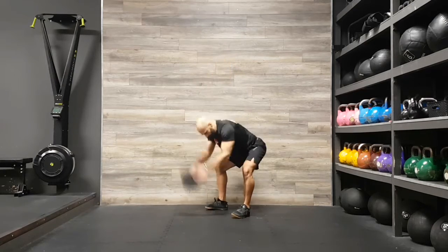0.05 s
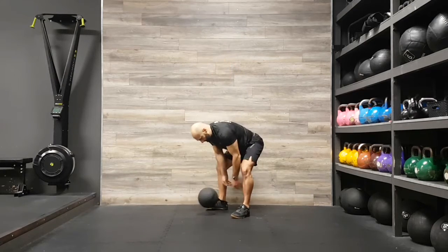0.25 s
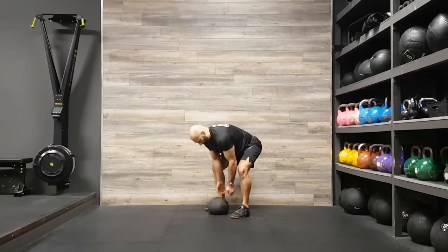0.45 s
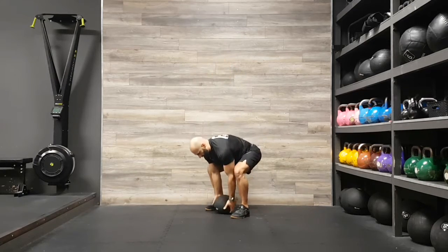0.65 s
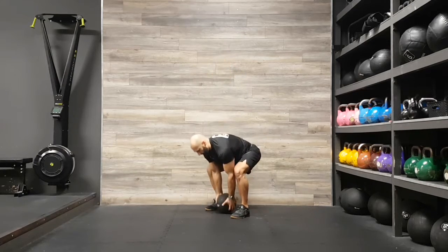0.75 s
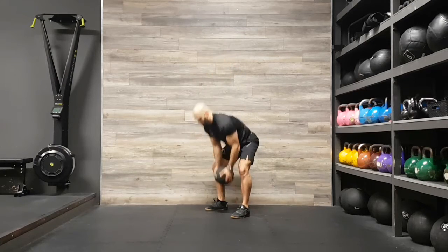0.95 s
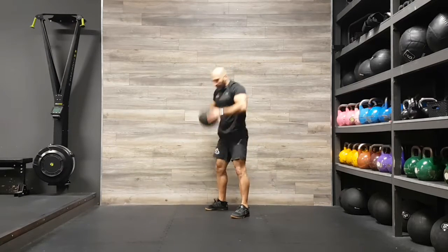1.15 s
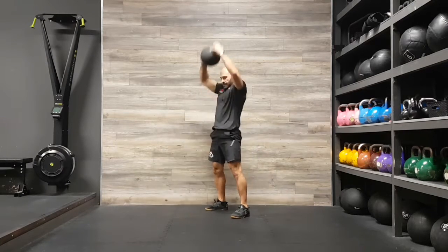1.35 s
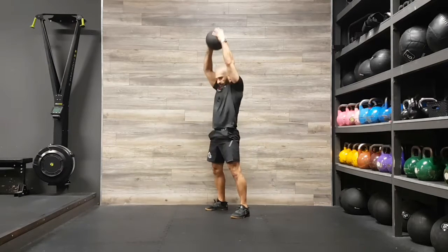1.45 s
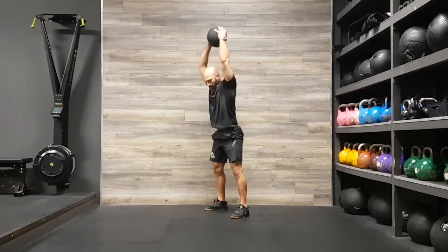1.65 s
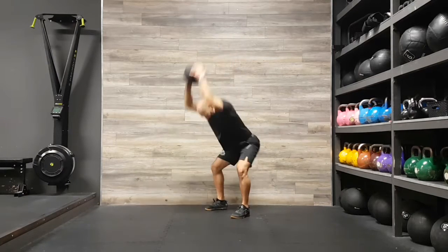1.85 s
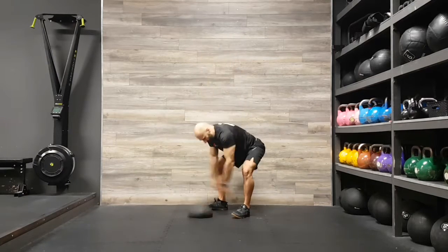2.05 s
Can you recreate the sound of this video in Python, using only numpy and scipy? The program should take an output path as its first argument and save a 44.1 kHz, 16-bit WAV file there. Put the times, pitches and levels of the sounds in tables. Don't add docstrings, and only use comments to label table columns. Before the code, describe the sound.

A heavy sand-filled ball slams on a rubber gym floor at 0.2 s, after a brief sleeve swish and shoe push: a sharp air slap, hollow low thud and quick wall echoes. A boomy tail fades over about a second, hiding a faint rebound at 0.54 s. Soft cloth rustles near 1.0 and 1.3 s, hands tap the ball at 1.56 and 2.03 s. Distant ventilation hums throughout, with slight microphone hiss.

```python
import sys
import numpy as np
from scipy import signal
from scipy.fft import rfft, irfft, next_fast_len
from scipy.io import wavfile
from scipy.ndimage import map_coordinates

SR = 44100
rng = np.random.default_rng(int(sys.argv[2]) if len(sys.argv) > 2 else 0)


def level_to_linear(level):
    exponent = np.asarray(level, float) / 20
    return 10 ** exponent


def log_audio(samples):
    frames = np.atleast_2d(samples).T
    limited = np.clip(frames, -1, 1)
    pcm = np.round(limited * 32767).astype(np.int16)
    wavfile.write(sys.argv[1], SR, pcm)


N = 92610

# f/Hz, level/dB per Hz
RUMBLE_COLOUR = [(12, -56), (30, -2.5), (60, 7.5), (100, -3), (200, -3.5), (300, -13), (600, -31),
                 (900, -55.5)]
# f/Hz, level/dB per Hz
AIR_COLOUR = [(300, 4), (500, 0), (1200, -4), (2500, -9), (4000, -16.5), (8000, -31.5), (12000, -46.5)]
# f/Hz, level/dB per Hz
HISS_COLOUR = [(1500, -37.5), (4000, -4), (8000, -7.5), (10000, -6.5), (13000, -2.5), (15300, 1.5),
               (15700, -42)]
# f/Hz, likeness/1
AIR_ALIKE = [(60, 0.99), (180, 0.93), (550, 0.64), (1650, 0.21), (4970, 0.33), (15000, -0.21)]
# f/Hz, left over right/dB
AIR_PAN = [(60, 0.0), (240, -0.5), (950, -0.5), (3770, 1.5), (15000, 1.0)]

# t/s, level/dB, rise/s, fall/s
SWISHES = [
    (0.192, -49, 0.019, 0.025),
    (.84, -70, 0.09, 0.036),
    (1.0, -66, 0.03, 0.04),
    (1.32, -64.5, 0.04, 0.047),
    (1.62, -72, 0.028, 0.029),
    (2.001, -72.5, 0.019, 0.14),
]
# f/Hz, level/dB per Hz
CLOTH_COLOUR = [(240, -16), (500, -17.5), (1200, -14), (2500, -18), (5700, -21.5), (8000, -28),
                (11800, -26.5), (15400, -31)]

# f/Hz, level/dB per Hz
STAMP_COLOUR = [(150, -17), (250, 0.5), (550, 2), (900, -17), (1500, -47.5)]
# t/s, contact level/dB, hall level/dB
KNOCKS = [
    (1.5594, -47.5, -48.5),
    (2.0329, -46.5, -50.5),
]
# f/Hz, level/dB per Hz
KNOCK_COLOURS = [
    [(80, 0), (200, -10), (550, -1.5), (950, -12), (1500, -11), (2300, -11), (5000, -26), (15400, -34.5)],
    [(200, -1), (450, -6.5), (750, -0.5), (1150, -8.5), (1500, -21), (2250, -15), (3000, -32),
     (9000, -43.5)],
]
# f/Hz, level/dB, t60/s
KNOCK_RINGS = [
    [(548, -46, 0.1), (1490, -49, .03), (2200, -59, .04), (3540, -50.5, 0.023)],
    [(629, -51, 0.055), (900, -47, 0.026), (458, -58, 0.038), (2310, -61, .02)],
]
# t/s, level/dB
SKIN_TICKS = [
    (1.5644, -44),
    (1.588, -53),
]

# f/Hz, t60/s
HALL_T60 = [(60, 1), (200, 0.86), (500, 0.97), (1500, 0.91), (3000, 0.68), (6000, 0.48), (11000, 0.34)]
# f/Hz, level/dB, t60/s
HALL_MODES = [(42.7, -10.5, 1.2), (74.4, -1, 0.46), (105.4, -3, 1.146), (140, -7, 1), (165, -5.5, 1),
              (195.9, 1.5, 0.82), (225, -30, 1.1), (263, -2.5, 1.094), (386.4, -13.5, 0.28),
              (407.7, -7.5, .7), (463, -6, .8)]
# f/Hz, level/dB per Hz
TAIL_LOW = [(15, -55), (30, -30), (60, -7.5), (150, -3.5), (225, 2), (325, -11), (430, -14.5), (700, -21.5),
            (1000, -54)]
# f/Hz, level/dB per Hz
TAIL_HIGH = [(350, -8.5), (600, -11), (2700, -13), (5000, -24.5), (7900, -34.5), (12500, -38), (15000, -45),
             (15500, -82.5)]
# f/Hz, left over right/dB
TAIL_PAN = [(60, -.4), (500, 1), (2000, 0), (5200, -1), (7500, 11), (13000, 6)]
# f/Hz, likeness/1
TAIL_ALIKE = [(60, .98), (180, .96), (350, .88), (700, .62), (1300, -.05), (2500, 0), (4500, .3),
              (15000, .1)]

THUD_HZ = [232, 180, 445, 95]
# level/dB, rise/s, t60/s
THUD_MODES = [(-2.5, 0.0029, 0.089), (-8, 0.0023, 0.033), (-12, 0.0063, .12), (-16.5, 0.0064, .2)]
# delay/s, level/dB re slap
SLAP_ECHOES = [(.0045, -6), (.0092, -13), (.0132, -12), (.0172, -12), (.0258, -14), (.0325, -14)]
# f/Hz, level/dB per Hz
SLAP_EDGE_COLOUR = [(4000, -30), (5800, -10), (7200, 0), (9000, -10), (12500, -8), (15000, -18),
                    (16200, -30)]
SLAP_EDGE_DB = [-17.5, -27.5]

FLOOR_WAVE_S, SLAP_S, THUD_S = 0.2098, 0.21805, 0.2194
BOUNCE_S = 0.541
DUCK_DB, RECOVER_S = 4, 0.42


def unit(x):
    return x / np.sqrt(np.mean(x ** 2) + 1e-20)


def along(points, hz):
    f, v = np.transpose(points)
    return np.interp(np.log(hz + 1), np.log(f + 1), v)


def since(s):
    return np.clip(np.arange(N) / SR - s, 0, None)


def wobble(rate):
    knots = rng.standard_normal(int(N * rate / SR) + 4)
    return map_coordinates(knots, [np.arange(N) * rate / SR])


def rush(spectrum, alike, pan):
    m = next_fast_len(N)
    hz = np.fft.rfftfreq(m, 1 / SR)
    turn = np.arccos(np.clip(along(alike, hz), -1, 1)) / 2
    points = [(0.73, -120)] + list(spectrum) + [(spectrum[-1][0] * 1.05, -120)]
    gain = level_to_linear(along(points, hz))
    mid, side = rfft(rng.standard_normal((2, m))) * gain * [np.cos(turn), np.sin(turn)]
    lean = level_to_linear(along(pan, hz) / 2)
    return unit(irfft([(mid + side) * lean, (mid - side) / lean], m)[:, :N])


def ring(s, hz, db, rise_s, t60, phase=0):
    t = since(s)
    return level_to_linear(db - 60 * t / t60) * (1 - np.exp(-t / rise_s)) * np.sin(2 * np.pi * hz * t + phase)


def burst(s, db, colour, t60, rise_s):
    t = since(s)
    noise = rush(colour, [(500, 0.76), (8000, 0.96)], [(500, 0)])
    return noise * (1 - np.exp(-t / rise_s)) * level_to_linear(db - 60 * t / t60)


def hall(s, db, colour, share=1):
    hz, t, z = signal.stft(rush(colour, TAIL_ALIKE, TAIL_PAN), SR, nperseg=512)
    t60 = share * along(HALL_T60, hz)[:, None]
    fall = level_to_linear(db - 60 * np.clip(t - s, 0, None) / t60)
    build = 1 - np.exp(-since(s) / 0.0036)
    return signal.istft(z * fall, SR, nperseg=512)[1][:, :N] * build


def ventilation():
    rumble = level_to_linear(-56 + 0.83 * wobble(6.6)) * rush(RUMBLE_COLOUR, AIR_ALIKE, AIR_PAN)
    air = level_to_linear(-64.5 + 0.5 * wobble(4.8)) * rush(AIR_COLOUR, AIR_ALIKE, AIR_PAN)
    hiss = level_to_linear(-77.5) * rush(HISS_COLOUR, [(5000, 0.05)], [(5000, 0.7)])
    return rumble + air + hiss


def cloth():
    t = np.arange(N) / SR
    swell = 0
    for s, db, rise_s, fall_s in SWISHES:
        width_s = np.where(t < s, rise_s, fall_s)
        swell = swell + level_to_linear(db) * np.exp(-0.5 * ((t - s) / width_s) ** 2)
    grain_db = 1 * wobble(150)
    return swell * level_to_linear(grain_db) * rush(CLOTH_COLOUR, AIR_ALIKE, AIR_PAN)


def stamp():
    return burst(0.19, -32, STAMP_COLOUR, t60=0.1, rise_s=0.0072)


def knocks():
    out = sum(burst(s, db, CLOTH_COLOUR, t60=0.004, rise_s=0.0001) for s, db in SKIN_TICKS)
    rise_s = 0.0006
    for (s, db, hall_db), colour, modes in zip(KNOCKS, KNOCK_COLOURS, KNOCK_RINGS):
        out = out + burst(s, db, colour, 0.07, rise_s)
        out = out + hall(s, hall_db, colour, share=0.5)
        out = out - sum(ring(s, hz, ring_db, rise_s, t60) for hz, ring_db, t60 in modes)
    return out


def rebound():
    low = hall(BOUNCE_S, -49, TAIL_LOW, share=0.53)
    high = hall(BOUNCE_S, -53.5, TAIL_HIGH, share=0.99)
    return low + high + burst(BOUNCE_S, -72, CLOTH_COLOUR, t60=0.02, rise_s=0.0004)


def hall_boom():
    phases = rng.uniform(0, 2 * np.pi, len(HALL_MODES))
    return sum(ring(THUD_S, hz, -22.5 + db, 0.026, t60, phase)
               for (hz, db, t60), phase in zip(HALL_MODES, phases))


def hall_tail():
    low = hall(THUD_S, -14.5, TAIL_LOW) * (1 - np.exp(-since(THUD_S) / 0.022))
    high = hall(SLAP_S, -22.5, TAIL_HIGH)
    early = hall(SLAP_S, -19, TAIL_HIGH, share=0.19)
    return low + high + early


def floor_wave():
    return ring(FLOOR_WAVE_S, 165, -13, rise_s=0.0034, t60=0.17, phase=-1.6)


def thud():
    direct = sum(ring(THUD_S, hz, *mode) for hz, mode in zip(THUD_HZ, THUD_MODES))
    wall_delay_s, wall_db = 0.0303, -8
    return direct + level_to_linear(wall_db) * np.roll(direct, round(wall_delay_s * SR))


def slap():
    t = np.arange(N) / SR - SLAP_S
    slap_db, width_s = -1.8, 0.000076
    pulse = 0
    for lag, db in [(0, 0.0055)] + SLAP_ECHOES:
        pulse = pulse - level_to_linear(slap_db + db) * np.exp(-0.5 * ((t - lag) / width_s) ** 2)
    edge = burst(SLAP_S, 0, SLAP_EDGE_COLOUR, t60=0.0034, rise_s=0.00005)
    return pulse + edge * level_to_linear(SLAP_EDGE_DB)[:, None]


def scene():
    background = ventilation() + cloth() + stamp() + knocks()
    slam = rebound() + hall_boom() + hall_tail() + floor_wave() + thud() + slap()
    return background + level_to_linear(DUCK_DB) * slam


def roll_off(x):
    return signal.sosfilt(signal.butter(12, 16310, fs=SR, output="sos"), x)


def record(dry):
    t = since(FLOOR_WAVE_S)
    duck_db = DUCK_DB * np.clip(1 - t / RECOVER_S, 0, 1) * (t > 0)
    hz = np.fft.rfftfreq(N, 1 / SR)
    mix = irfft(rfft(dry * level_to_linear(-duck_db)) * (hz < 16250), N)
    return roll_off(mix)


dry = scene()
out = record(dry)
log_audio(out)
```